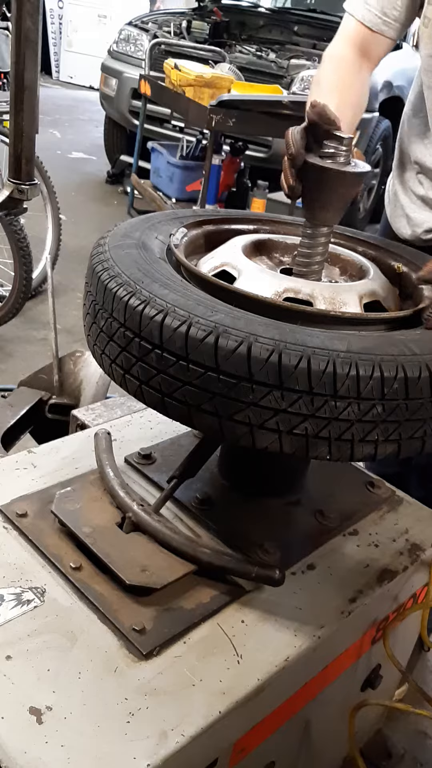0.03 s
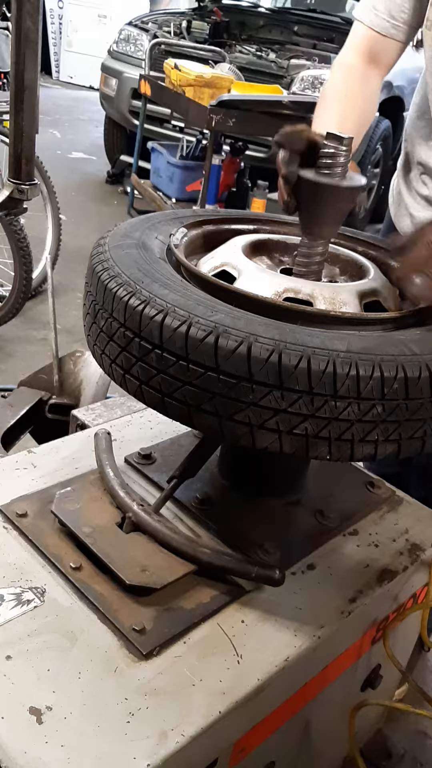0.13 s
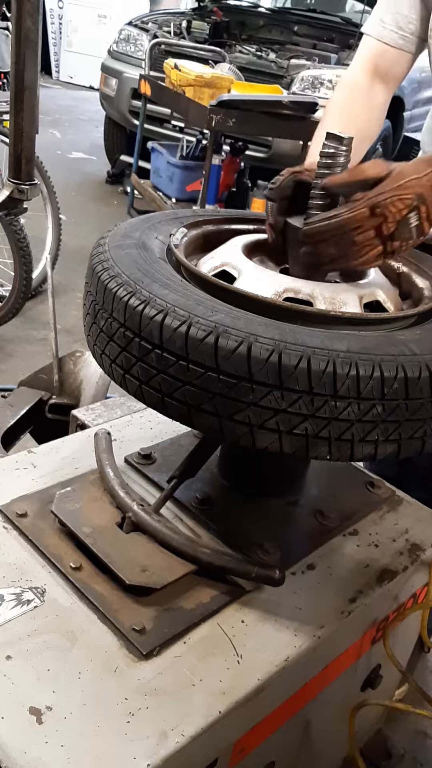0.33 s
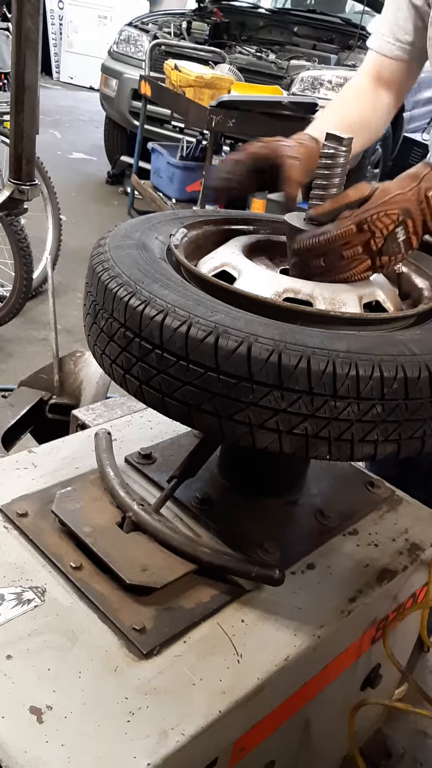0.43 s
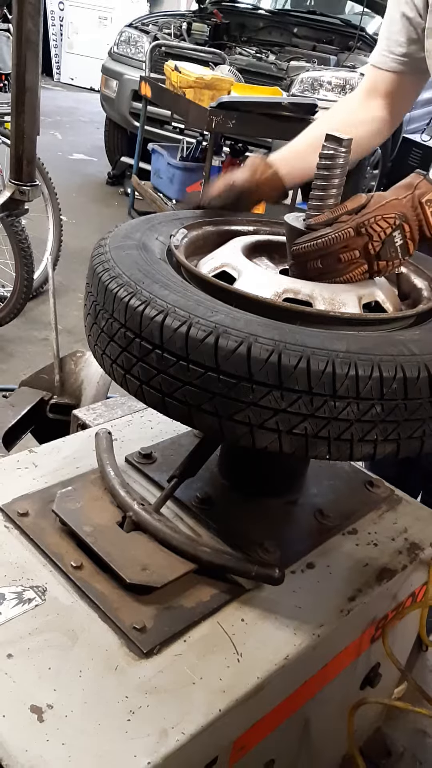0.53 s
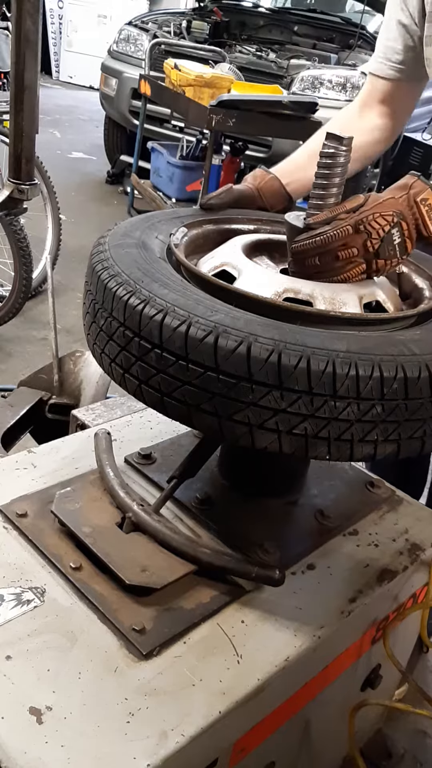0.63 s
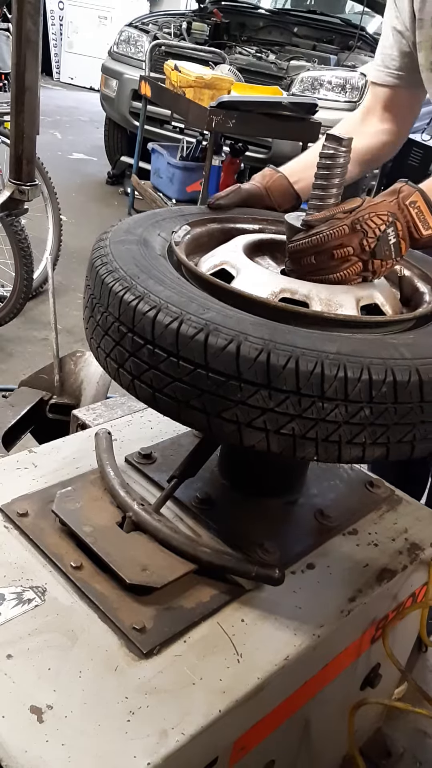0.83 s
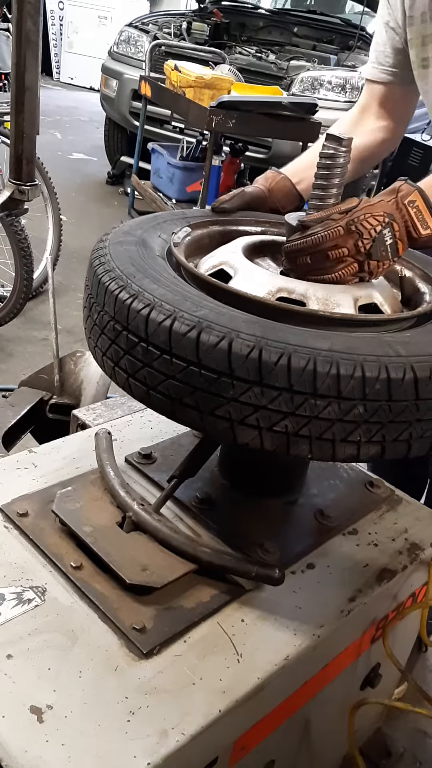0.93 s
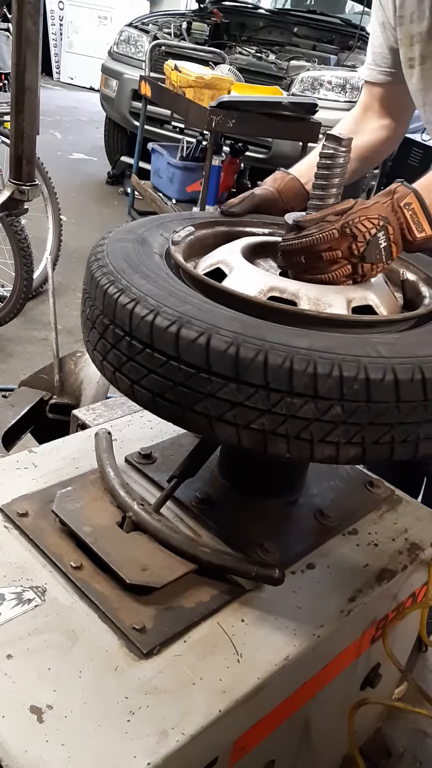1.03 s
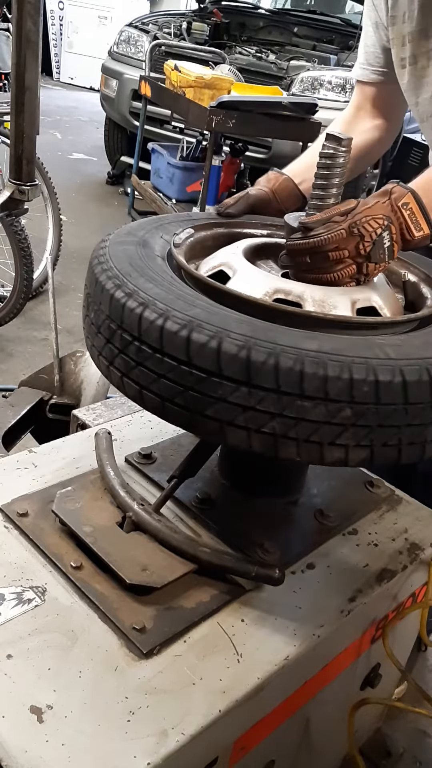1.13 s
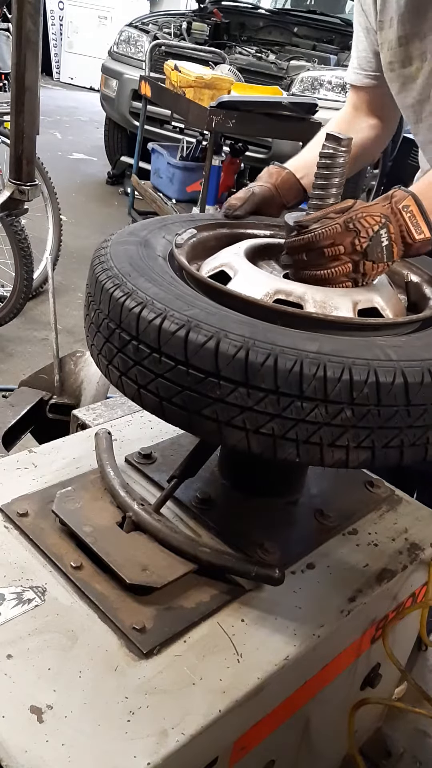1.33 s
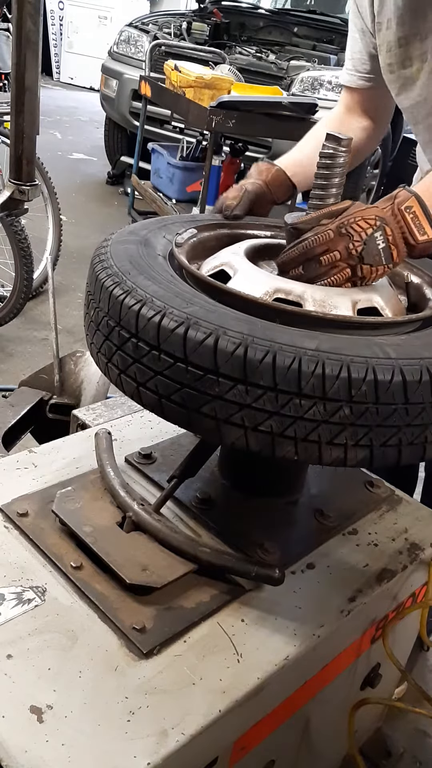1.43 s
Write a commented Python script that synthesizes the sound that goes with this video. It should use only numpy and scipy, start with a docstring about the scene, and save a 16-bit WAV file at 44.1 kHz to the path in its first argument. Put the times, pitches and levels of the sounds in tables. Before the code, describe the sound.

A steel cone clanks onto a car wheel's hub after a quick, ringing rasp down a threaded shaft. Dull knocks, rubs and small scrapes follow as hands shift the wheel in an echoing garage.

```python
"""A steel centring cone slides down a wheel balancer's threaded shaft and clanks on a car wheel's hub.
The threads make it rasp and sing on the way; it chatters as it lands and rings the wheel.
Gloved hands then shift the wheel with dull knocks, rubs and small scrapes.
The hard-walled garage echoes, over a low murmur and a faint hiss."""
import sys
import numpy as np
from scipy import signal
from scipy.fft import rfft, irfft
from scipy.io import wavfile

SR = 44100
rng = np.random.default_rng(int(sys.argv[2]) if len(sys.argv) > 2 else 0)


def log_audio(samples):
    """Write samples as a 16-bit WAV file to the path given in sys.argv[1]."""
    # one column per channel
    frames = np.atleast_2d(samples).T
    # limit to full scale, then quantise
    limited = np.clip(frames, -1, 1)
    pcm = np.round(limited * 32767).astype(np.int16)
    wavfile.write(sys.argv[1], SR, pcm)


N = 66150
T = np.arange(N) / SR
BINS_HZ = np.fft.rfftfreq(N, 1 / SR)
HALF_LR = np.array([[.5], [-.5]])
TOP_HZ = 15900


def undb(db):
    """Decibels to gain."""
    return 10 ** (np.asarray(db) / 20)


def at(points, hz):
    """Interpolate (f, value) points over log frequency."""
    f, values = np.array(points, float).T
    return np.interp(np.log(np.maximum(hz, 1)), np.log(f), values)


def unit(x):
    """Scale to rms 1."""
    return x / np.sqrt(np.mean(x ** 2))


def decay(t60_s):
    """Envelope falling 60 dB in t60_s."""
    return np.exp(-np.log(1000) * T / t60_s)


# Left-right likeness: f/Hz, correlation
LIKENESS = [(130, .93), (260, .7), (500, .2), (1200, -.15), (12000, 0)]

def noise(gain):
    """Stereo noise, rms 1, shaped by a gain per bin; bass alike in both channels."""
    alike = at(LIKENESS, BINS_HZ)
    mid, side = rfft(rng.standard_normal((2, N)))
    mid, side = mid * np.sqrt(1 + alike), side * np.sqrt(1 - alike)
    return unit(irfft(np.array([mid + side, mid - side]) * gain, N))


def ring(modes, phase=0):
    """Decaying sines from (f, level, t60) rows; left-right phase gap set by the likeness."""
    out = 0
    for k, (hz, db, t60_s) in enumerate(modes):
        gap = (-1) ** k * np.arccos(at(LIKENESS, hz)) * HALF_LR
        out += undb(db) * decay(t60_s) * np.sin(2 * np.pi * hz * T + gap + phase)
    return out


def fade(x, t60_curve):
    """Decay each octave at its own rate."""
    octave = np.log2(np.clip(BINS_HZ, 2 ** 7, 2 ** 14))
    spectrum, out = rfft(x), 0
    for k in range(7, 15):
        band = irfft(spectrum * np.maximum(1 - abs(octave - k), 0), N)
        out += band * decay(at(t60_curve, 2. ** k))
    return out


def play(force, response):
    """Convolve a force or sound with a stereo response."""
    return signal.fftconvolve(np.atleast_2d(force), response, axes=1)[:, :N]


def delay(x, start_s):
    """Start a stereo sound at start_s."""
    return np.pad(x, ((0, 0), (int(start_s * SR), 0)))[:, :N]


def strike(response, start_s, cut_hz, order):
    """Start a response, dulled by the contact's cut-off."""
    contact = signal.butter(order, cut_hz, fs=SR, output="sos")
    return delay(signal.sosfilt(contact, response), start_s)


# Murmur spectrum: f/Hz, level/dB
AIR_SPECTRUM = [(25, -12), (80, -12.5), (130, -1.5), (260, -0.5), (420, -7), (750, -13), (1200, -16),
                (2700, -23.5), (4200, -17.5), (5600, -16), (7500, -30.5), (12000, -27.5), (16000, -32)]
# Narrow hisses: f/Hz, width/Hz, level/dB
HISSES = [(5280, 120, -67.5), (10050, 380, -67.5), (15540, 250, -62)]

def air(level_db=-50.5, waver_db=.3):
    """Low, wavering workshop murmur with narrow hisses."""
    waver = np.interp(T, np.linspace(0, T[-1], 24), rng.standard_normal(24))
    out = undb(level_db + waver_db * waver) * noise(undb(at(AIR_SPECTRUM, BINS_HZ)))
    for hz, width_hz, db in HISSES:
        peak = 1 / (1 + (2 * (BINS_HZ - hz) / width_hz) ** 2)
        out += undb(db) * noise(peak)
    return out


# Echo spectrum: f/Hz, level/dB
ECHO_SPECTRUM = [(100, -6), (500, 7.5), (5000, -4.5), (11000, -9.5)]
# Echo decay: f/Hz, t60/s
ECHO_T60 = [(150, 1.12), (600, 0.55), (5000, 0.62), (12000, 1.12)]

def garage(x, level_db=-9.5, build_s=.0024):
    """Dense echoes off hard walls build quickly and fade."""
    echo = fade(noise(undb(at(ECHO_SPECTRUM, BINS_HZ))), ECHO_T60)
    echo *= 1 - np.exp(-T / build_s)
    return undb(level_db) * play(x, unit(echo) / np.sqrt(N))


# Wheel's short low modes: f/Hz, level/dB
LOW_SPECTRUM = [(100, -15), (160, -1), (200, -8), (260, 4.5), (550, -11), (850, -12.5), (1300, -26),
                (4000, -37.5)]
# Rubs on the wheel: t/s, length/s, level/dB
RUBS = [(0.602, .21, -42), (1.42, 0.092, -43.5)]

def rubs():
    """Glove and tyre friction swells and fades, stirring the wheel's short low modes."""
    pressure = sum(undb(db) * np.sin(np.pi * np.clip((T - start_s) / length_s, 0, 1))
                   for start_s, length_s, db in RUBS)
    return pressure * noise(undb(at(LOW_SPECTRUM, BINS_HZ)))


# Tyre-damped wheel modes: f/Hz, level/dB, t60/s
THUD_MODES = [(260.7, 0.5, 0.14), (350, -9, .05)]
# Knocks: t/s, thud level/dB, overtone f/Hz, overtone level/dB
KNOCKS = [(.372, -23, 624, -40), (.931, -32.5, 561, -25.5), (0.9394, -31.5, 350, -28),
          (.994, -32, 617, -39), (1.022, -31.5, 354, -27.5), (1.076, -25, 440, -33),
          (1.089, -28.5, 567, -38), (1.146, -33.5, 343, -25), (1.156, -27.5, 471, -31),
          (1.186, -27, 521, -36), (1.241, -40, 724, -43.5), (1.3313, -37, 443.6, -26),
          (1.338, -26, 570, -32), (1.394, -32, 430, -53)]

def knocks(rise_s=.0012, low_db=-11, low_t60_s=.088, overtone_t60_s=.065):
    """The damped wheel thuds on its seat; each contact point picks its own overtone."""
    thud = ring(THUD_MODES) * (1 - np.exp(-T / rise_s))
    colour = undb(at(LOW_SPECTRUM, BINS_HZ))
    out = 0
    for start_s, thud_db, overtone_hz, overtone_db in KNOCKS:
        low_modes = undb(low_db) * decay(low_t60_s) * noise(colour)
        overtone = ring([(overtone_hz, overtone_db, overtone_t60_s)])
        out += strike(undb(thud_db) * (thud + low_modes) + overtone, start_s, cut_hz=990, order=4)
    return out


# Touches on the shaft: t/s, level/dB
TINKS = [(1.018, -46), (1.176, -43), (1.189, -41)]

def tinks(mode_hz=5345, t60_s=.05):
    """Light touches ring one high mode of the shaft."""
    force = np.zeros(N)
    for start_s, db in TINKS:
        force[int(start_s * SR)] += undb(db)
    return play(force, ring([(mode_hz, 0, t60_s)]))


# Wheel modes: f/Hz, level/dB, t60/s
WHEEL_MODES = [(234.4, -20.5, .36), (263.1, -17.5, .28), (391.6, -19.5, 0.16), (437.4, -31.5, 0.24),
               (597, -14, 0.13), (709, -15, 0.1), (777, -19, 0.16), (828, -20, 0.17), (870, -30.5, 0.39)]
# Modes of the cone on its shaft: f/Hz, level/dB, t60/s
CONE_MODES = [(1348, -25, 0.22), (1551, -18.5, 0.096), (1664.6, -5.5, .11), (1720, -16.5, .18),
              (1838, -20.5, .19), (1902, -22.5, .17), (2470, -4, 0.036), (2655, -14, 0.07),
              (2982, -20, 0.14), (3285, -27.5, 0.24), (3940, -28, .1), (3998, -18, 0.17), (4340, -19, 0.15),
              (5274, -20.5, 0.11), (6040, -31.5, 0.18), (10200, -25.5, 0.11), (11320, -25, 0.12)]

def ringing(seat_s=.3052, rise_s=.0022, cone_db=-1):
    """Wheel and cone ring on once the cone seats."""
    modes = ring(WHEEL_MODES, phase=np.pi / 2) + undb(cone_db) * ring(CONE_MODES)
    return delay(modes * (1 - np.exp(-T / rise_s)), seat_s)


def singing(grip, level_db=-29.5, mode_hz=1646, t60_s=.051, wander_hz=19.7, wanders_per_s=230):
    """Stick-slip locks on to the cone's main mode."""
    wander = np.interp(T * wanders_per_s, np.arange(N), rng.standard_normal(N))
    slip = grip * np.sin(2 * np.pi * np.cumsum(mode_hz + wander_hz * wander) / SR)
    tone = unit(play(slip, ring([(mode_hz, 0, t60_s)])))
    grip_rms = np.sqrt(np.mean(grip ** 2))
    return undb(level_db) * grip_rms * tone


# Spectrum of one catch: f/Hz, level/dB
RASP_SPECTRUM = [(100, -25.5), (235, 7), (350, -1.5), (600, -1.5), (1050, -14.5), (1400, -2.5), (1750, 0.5),
                 (2400, -13), (3800, -14), (5000, -23.5), (7500, -46), (9500, -36.5), (10300, -22.5),
                 (13000, -38)]

def rasp(catches, burst_db=-24, t60_s=.053, cone_db=-32, wheel_db=-30):
    """Each catch gives a noise burst and faintly rings cone and wheel."""
    burst = undb(burst_db) * noise(undb(at(RASP_SPECTRUM, BINS_HZ))) * decay(t60_s)
    return play(catches, burst + undb(cone_db) * ring(CONE_MODES) + undb(wheel_db) * ring(THUD_MODES))


# Cone on the threads: t/s, singing level/dB, rasp level/dB, length/s
SCRAPES = [(0, -3, -3, .012), (.02, -20, -13, .05), (.083, -9, -6, .014), (.131, -7, -4, .026),
           (.173, 0, -3, .02), (.201, 3, -2, .016), (.232, -4, -4, .026), (.265, -1, -2, .015),
           (.294, -6, -12, .01), (.701, -35, -14, .016), (1.014, -31, -11, .018), (1.065, -18, -18, .006),
           (1.08, -11, -6, .014), (1.18, -27, -19, .05), (1.334, -23, -19, .014)]

def scrapes(catches_per_s=692.7, scatter_db=3.5, bite_db=4, max_catches=64):
    """The cone drags over the threads: tiny catches rasp, stick-slip sings."""
    catches, grip = np.zeros(N), np.zeros(N)
    for start_s, sing_db, rasp_db, length_s in SCRAPES:
        offsets_s = (np.arange(max_catches) + rng.random(max_catches)) / catches_per_s
        sizes_db = scatter_db * rng.standard_normal(max_catches)
        sizes_db[0] += bite_db
        gate = np.clip((length_s - offsets_s) * catches_per_s + 1, 0, 1)
        sizes = undb(sizes_db) * gate
        samples = ((start_s + offsets_s) * SR).astype(int)
        np.add.at(catches, samples, undb(rasp_db) * sizes / np.linalg.norm(sizes))
        grip += undb(sing_db) * ((T >= start_s) & (T < start_s + length_s))
    return singing(grip) + rasp(catches)


# Dense short modes of cone and wheel: f/Hz, level/dB
CLANK_SPECTRUM = [(100, -19), (155, -2.5), (200, -10.5), (260, -15), (380, 0.5), (500, -18.5), (750, -0.5),
                  (1150, -14.5), (1650, 2.5), (2150, -11), (2600, -5.5), (3500, -11), (4200, -4),
                  (5900, -13), (7300, -26.5), (9700, -33.5), (10400, -11), (10950, -29.5), (11400, -9.5),
                  (12300, -38), (16000, -23.5)]
# Their decay: f/Hz, t60/s
CLANK_T60 = [(150, 0.058), (700, 0.075), (1700, 0.082), (4500, 0.12), (12000, 0.27)]
# Landing contacts: t/s, level/dB, cut-off f/Hz
LANDING = [(.3042, -1.5, 11100), (.3068, -4.5, 4700), (.3085, 0.5, 2600), (.3135, 1.5, 10000),
           (.332, -9, 2575), (.346, -9.5, 5130)]

def clank(level_db=-15.5):
    """Steel on steel: the cone chatters on the hub, each contact a crash of short modes."""
    colour = undb(at(CLANK_SPECTRUM, BINS_HZ))
    out = 0
    for start_s, db, cut_hz in LANDING:
        crash = undb(level_db + db) * fade(noise(colour), CLANK_T60)
        out += strike(crash, start_s, cut_hz, order=2)
    return out


# Stereo balance: f/Hz, left minus right/dB
BALANCE = [(130, -1), (600, -2.5), (1500, 1.5), (4000, 1), (11000, 1.5)]

def scene(ring_send_db=-14, handling_send_db=-2, bass_cut_hz=120):
    """Slide, clank and handling in the garage, with the deep bass cut away."""
    contacts = scrapes() + clank() + tinks()
    rings = ringing()
    handling = knocks() + rubs()
    echoes = garage(contacts + undb(ring_send_db) * rings + undb(handling_send_db) * handling)
    highpass = signal.butter(3, bass_cut_hz, "high", fs=SR, output="sos")
    heard = signal.sosfilt(highpass, contacts + rings + handling + echoes)
    balance = undb(at(BALANCE, BINS_HZ) * HALF_LR)
    return irfft(rfft(heard) * balance, N) + air()


def record(dry):
    """Clip at full scale, then cut the top steeply."""
    lowpass = signal.ellip(10, .2, 80, TOP_HZ, fs=SR, output="sos")
    return signal.sosfilt(lowpass, np.clip(dry, -1, 1))


dry = scene()
out = record(dry)
log_audio(out)
```